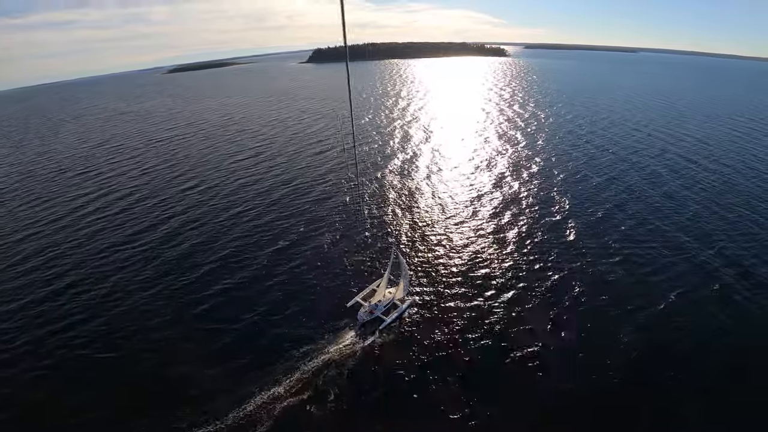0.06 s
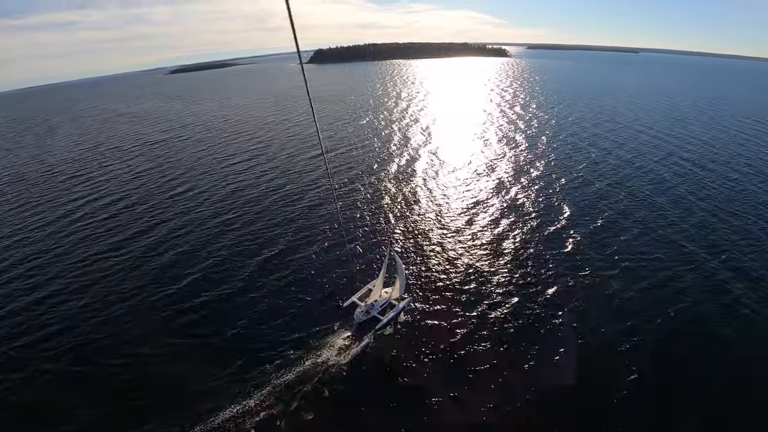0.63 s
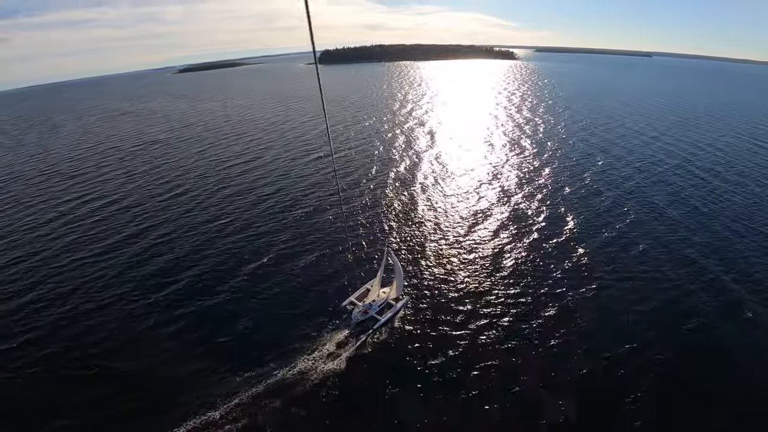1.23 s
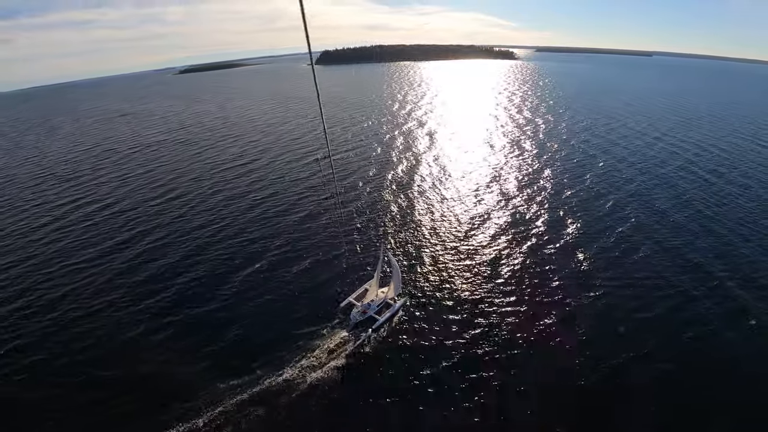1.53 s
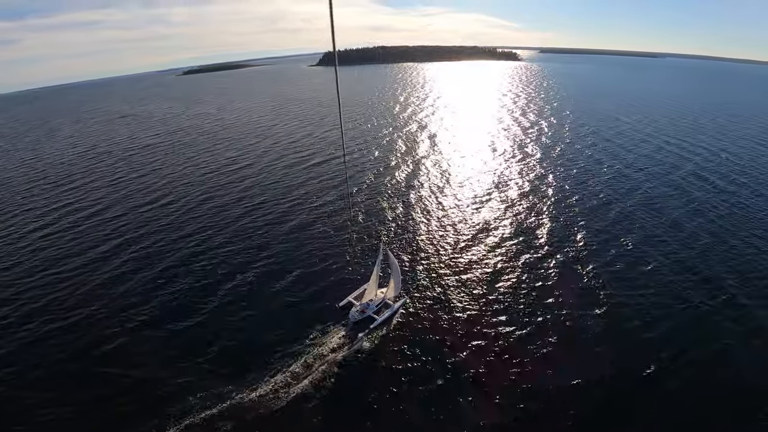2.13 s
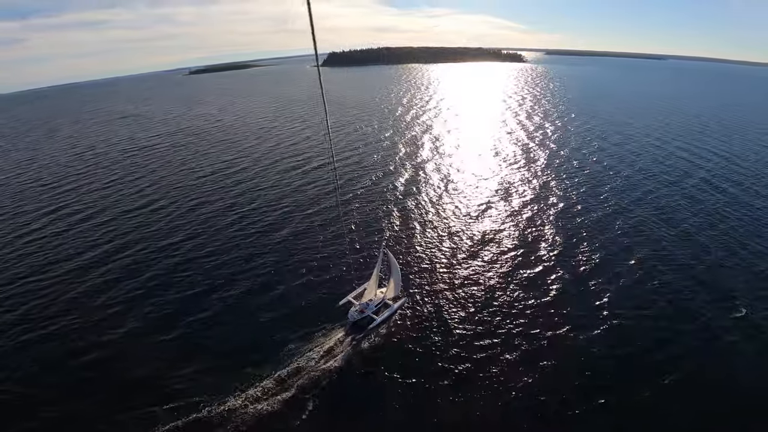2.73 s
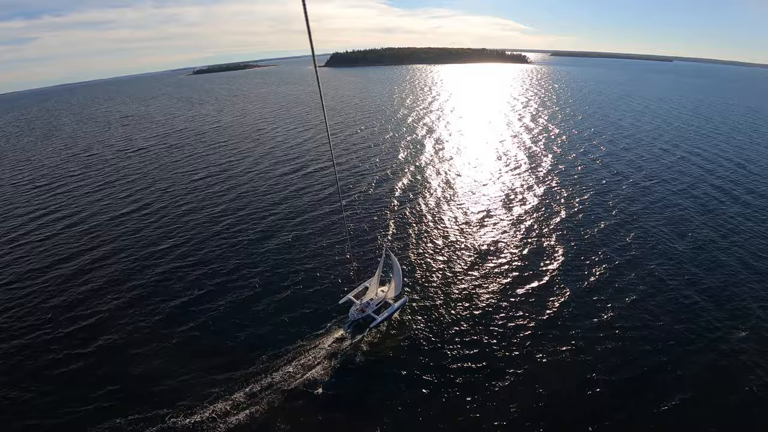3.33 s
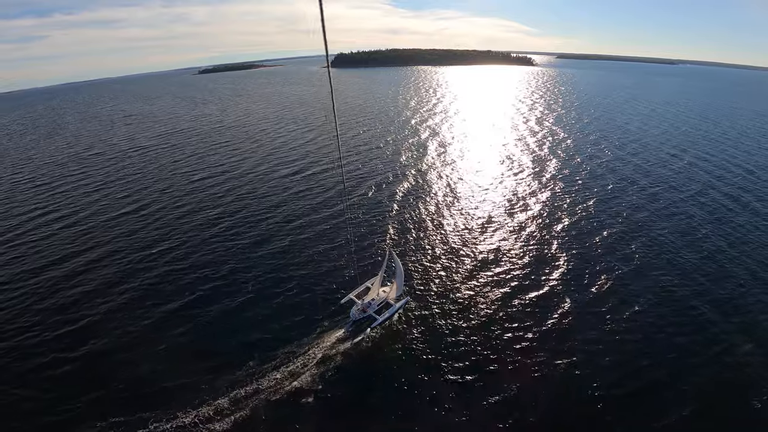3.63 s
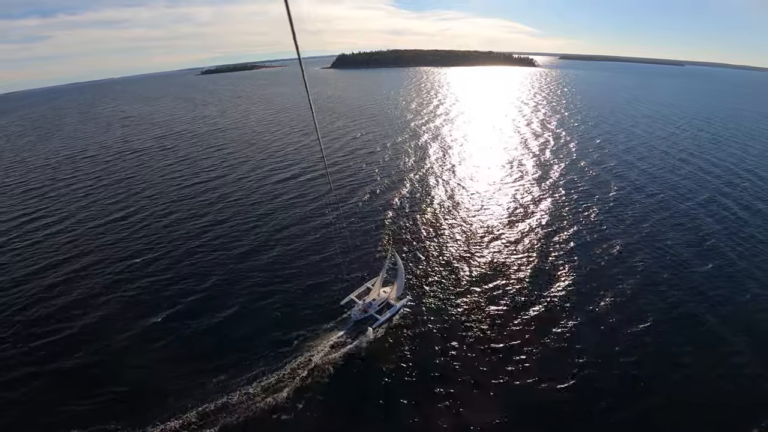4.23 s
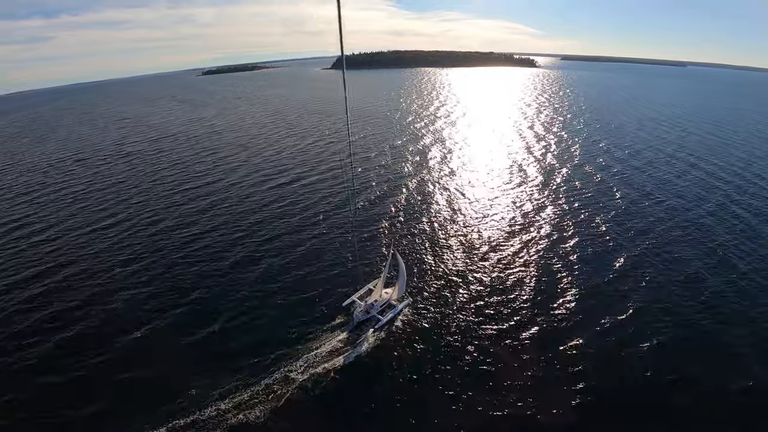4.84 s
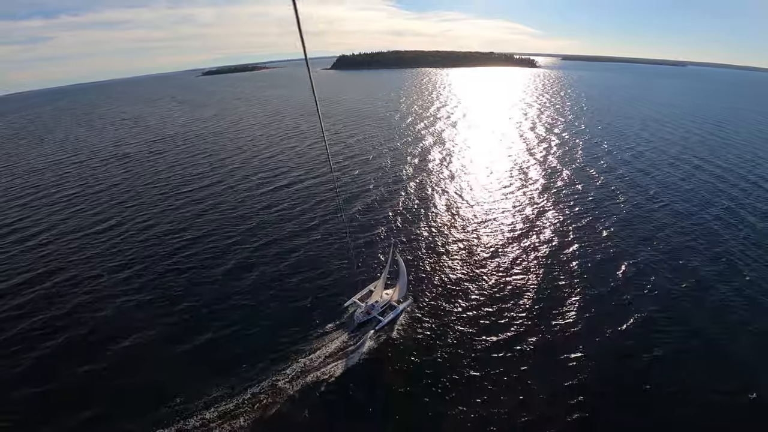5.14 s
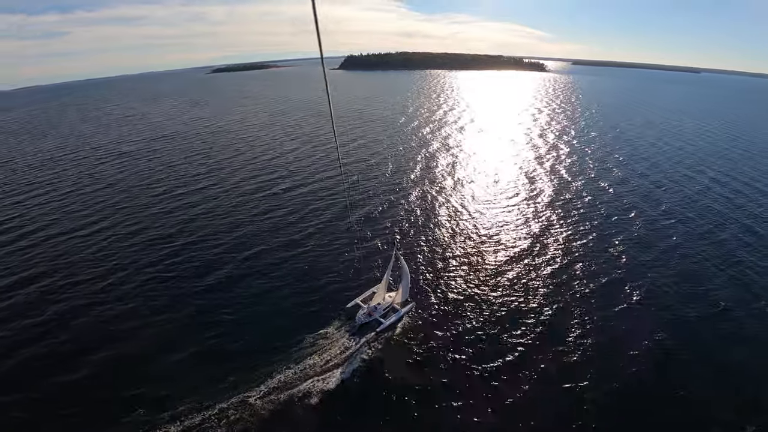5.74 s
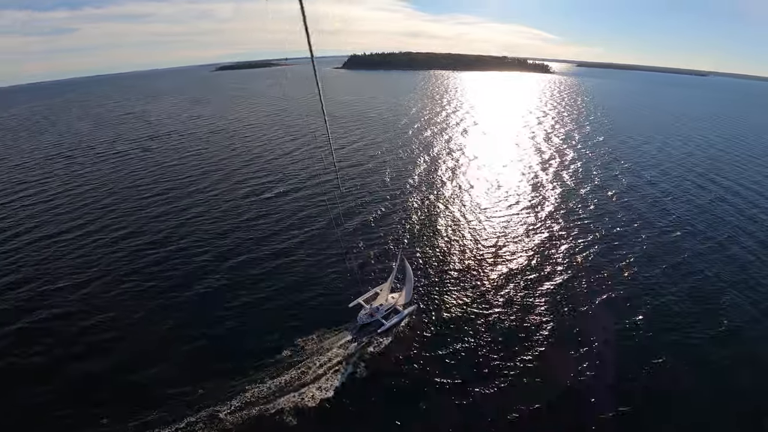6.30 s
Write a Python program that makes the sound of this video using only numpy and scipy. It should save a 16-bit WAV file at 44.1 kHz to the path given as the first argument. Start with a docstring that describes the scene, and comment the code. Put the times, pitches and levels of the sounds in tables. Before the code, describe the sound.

From the start, wind buffets the microphone of a camera hanging from a kite line, making a deep, throbbing rumble full of irregular thumps and brief lulls. A softer rush and hiss of air runs underneath throughout, with a light whoosh around 0.9 seconds and another just after 4. The taut line sings a thin, wavering, mid-pitched hum, much quieter than the rumble, flaring briefly now and then. At about 4 seconds the hum steps slightly higher and wanders more, while the hiss swells a little. Three short, hard gusts then break over the microphone with a low, fluttering roar: one at about 4.8 seconds, one at 5, and a longer one from 5.5 to 5.8. The rumble, hiss and hum continue until the sound ends at about 6.4 seconds.

```python
"""A deep, throbbing rumble: eddies buffet the microphone of a camera on a kite line above a sailing boat.
Air rushes and hisses round the housing. The taut line sheds vortices and sings a thin, wavering
aeolian tone. Near the end three hard gusts break over the microphone port."""
import sys
import numpy as np
from scipy import signal
from scipy.fft import rfft, irfft
from scipy.io import wavfile
from scipy.ndimage import uniform_filter1d

SR = 44100
rng = np.random.default_rng(int(sys.argv[2]) if len(sys.argv) > 2 else 0)


def log_audio(samples):
    """Write samples as a 16-bit WAV file to the path given in sys.argv[1]."""
    # one column per channel
    frames = np.atleast_2d(samples).T
    # limit to full scale, then quantise
    limited = np.clip(frames, -1, 1)
    pcm = np.round(limited * 32767).astype(np.int16)
    wavfile.write(sys.argv[1], SR, pcm)


N = 280917
TIME_S = np.arange(N) / SR

# Flow round the housing, re its usual strength: t/s, level/dB
FLOW_LEVEL = [(0, -3.5), (.12, -5), (.35, -1.5), (.65, -1.5), (.71, .3), (.82, 0.5), (.92, 0.5), (1.2, 1),
              (1.27, 1.5), (1.6, -0.5), (1.72, -0.5), (1.83, 0), (1.9, -1.5), (2.0, 0.5), (2.4, -0.4),
              (2.48, 0.8), (2.57, -0.5), (2.9, -0.1), (3.08, 0), (3.17, 0), (3.24, 1.5), (3.35, 0),
              (3.63, 2), (3.71, -0.3), (3.83, -0.5), (3.88, 0.5), (4.06, 0), (4.095, 2), (4.28, 2),
              (4.35, 2.5), (4.55, 3.5), (4.77, 3.5), (4.805, 4.5), (4.83, 3.5), (4.89, 3), (4.94, 1.4),
              (5.16, -0.5), (5.3, 0), (5.43, 1), (5.49, 2.5), (5.58, 1), (5.72, -0.5), (5.87, -1.5),
              (6.12, 0.5), (6.21, -0.5), (6.37, 2.8)]
# Small eddies in the housing's wake: t/s, level/dB
CHURN_LEVEL = [(0, -41), (.8, -38.5), (1.45, -36.5), (1.8, -39), (2.05, -38.5), (2.25, -35.5), (2.5, -36),
               (3.2, -36), (3.95, -33), (4.2, -34.5), (4.7, -31.5), (5.3, -34.5), (5.9, -36), (6.37, -31.5)]
# Air whooshing past: t/s, level/dB
WHOOSH_LEVEL = [(0, -50.5), (.2, -52.5), (.35, -50), (.62, -49), (.79, -46.5), (.87, -45), (.98, -48.5),
                (1.08, -48.5), (1.3, -52.5), (1.7, -55), (2.4, -51.5), (3.3, -55.5), (3.8, -52.5),
                (4.06, -50), (4.1, -46), (4.5, -52), (4.88, -52.5), (4.96, -65), (6.37, -59.5)]
# Air noise spectra, relative density: f/Hz, level/dB
CHURN_SPECTRUM = [(60, -13), (100, -2), (150, 1), (190, 0.5), (270, -0.5), (340, -7.5), (450, -19)]
RUSH_SPECTRUM = [(150, -10), (300, -5), (400, -5.5), (520, -4.5), (800, -10), (1050, -12), (1500, -17),
                 (2500, -26), (5000, -63)]
HISS_SPECTRUM = [(700, -6), (1500, -3), (2200, -1.1), (3300, -1.1), (4500, -1.5), (5200, -3), (6500, -23),
                 (9000, -48.5)]
FINE_HISS_SPECTRUM = [(3500, -11.5), (5000, 2), (5900, 2.5), (7000, -3), (8500, -10.5), (10000, -19),
                      (12000, -30.5), (15000, -43.5)]
WHOOSH_SPECTRUM = [(1700, -20), (2000, -2.5), (2300, 0), (2900, 0.5), (3500, 1), (4000, 0), (4600, -4),
                   (5400, -15)]

# Aeolian tone of the line: t/s, shedding f/Hz, level/dB
LINE_TONE = [(0, 647, -49), (.5, 649, -46), (.85, 647.3, -43), (1.2, 645, -44.5), (1.5, 647.7, -42),
             (2.0, 643.5, -42), (2.35, 646, -40.5), (2.7, 643, -41.5), (3.05, 643, -46.5),
             (3.85, 642.6, -43), (4.2, 674, -41), (4.5, 668.4, -41), (4.8, 667, -42.5), (5.12, 698.6, -47),
             (5.45, 676.7, -39.3), (5.65, 680, -42.5), (5.85, 695, -43.5), (6.15, 679, -41.5),
             (6.37, 674, -45)]
# Brief flares of the tone: t/s, length/s, rise/dB
LINE_FLARES = [(1.12, 0.05, 8), (1.395, 0.045, 9.5), (1.74, 0.043, 4.5), (1.98, 0.11, 6),
               (2.34, 0.046, 2.5), (2.93, 0.058, 4), (3.15, .09, 5), (3.28, 0.028, 7), (3.58, .07, -4),
               (4.01, 0.063, 7.5), (4.245, 0.036, 9), (4.46, 0.15, 5.5), (5.09, 0.041, 12.5),
               (5.38, 0.08, 3), (5.545, 0.048, 8), (6.17, .1, 5.5)]

# Eddy pressure on the port: t/s, level/dB
BUFFET_LEVEL = [(0, -26), (.7, -24.5), (1.05, -22.5), (1.5, -22.5), (2.0, -22.5), (2.7, -22.5),
                (3.5, -25.5), (4.3, -29), (4.8, -23.5), (5.25, -26), (5.62, -22), (5.9, -29), (6.37, -21.5)]
# Its spectrum, relative density: f/Hz, level/dB
BUFFET_SPECTRUM = [(8, -19), (22, -1.5), (48, 3), (68, -2), (98, -3), (125, -10.5), (150, -10), (190, -20),
                   (280, -21.5), (400, -37.5), (1000, -75.5)]
# Single large eddies: t/s, length/s, rise/dB
EDDY_THUMPS = [(.13, 0.18, 4), (.3, 0.15, 5.5), (.41, 0.11, 3), (.65, 0.086, 5.5), (.83, 0.072, 0.5),
               (.92, .06, 0.5), (1.075, 0.082, 5.5), (1.13, 0.059, 8), (1.24, 0.07, 2.5),
               (1.325, 0.071, 4.5), (1.385, .05, 1.5), (1.435, 0.066, -0.5), (1.72, 0.12, 6.5),
               (1.78, .06, 3.5), (1.915, 0.061, 5), (1.98, 0.044, 4), (2.03, 0.038, 3), (2.1, .05, -2),
               (2.185, .06, 5), (2.26, .05, 2), (2.34, 0.087, 4.5), (2.61, 0.058, -3), (2.72, 0.029, 2.5),
               (2.96, 0.044, 3.5), (3.08, 0.053, 5.5), (3.4, 0.048, 6.5), (3.49, 0.053, 2),
               (3.58, 0.06, 3.5), (3.67, 0.06, 5), (3.98, 0.083, 3.5), (4.07, 0.12, 4.5),
               (4.37, 0.064, 7.5), (4.555, 0.1, 7), (4.625, 0.064, 4), (4.857, .04, 7.5),
               (5.37, 0.079, 2.5), (5.5, 0.041, 5), (5.91, 0.057, 9), (6.21, 0.073, 4)]
# Lulls between eddies: t/s, length/s, drop/dB
EDDY_LULLS = [(.195, 0.037, 3), (.49, 0.079, 6), (.595, .05, 4), (.73, 0.16, 9), (1.19, .05, 1),
              (1.535, 0.079, 7), (1.875, 0.07, 4), (2.14, .04, 2), (2.29, .04, 3), (2.49, 0.042, 4),
              (2.9, 0.066, 11), (3.33, .05, 2), (3.73, 0.056, -0.5), (4.48, 0.046, 3), (4.9, .08, 10),
              (5.82, 0.094, 1), (6.03, 0.12, 0)]

# Bursts, 2-3 per gust: start t/s, end t/s, shedding f/Hz, push level/dB, roar level/dB
GUST_BURSTS = [(4.735, 4.786, 88, -21, -22), (4.794, 4.833, 99, -21, -20), (4.964, 5.003, 64, -16, -22),
               (5.01, 5.052, 108, -15.5, -22), (5.535, 5.622, 92, -18.5, -21.5),
               (5.621, 5.694, 78, -18.5, -23), (5.685, 5.769, 60, -18.5, -22.5)]
# Gust roar spectrum, relative density: f/Hz, level/dB
ROAR_SPECTRUM = [(80, -8), (110, 5.5), (160, 5.5), (210, -3.5), (270, -1.5), (400, -9), (550, -17),
                 (900, -31), (2000, -69)]
# Lopsided vortex push: multiple of the shedding rate, relative level/dB
PUSH_HARMONICS = [(1, 0.5), (2, -4), (3, -14)]


def undb(db):
    """Decibels to gain."""
    return 10 ** (np.asarray(db) / 20)


def unit_rms(x):
    """Scale to rms 1."""
    return x / np.sqrt(np.mean(x ** 2))


def steady_rms(x, span_s):
    """Hold the running rms near 1."""
    width = max(int(span_s * SR), 2)
    return x / np.sqrt(uniform_filter1d(uniform_filter1d(x ** 2, width), width))


def curves(table):
    """Interpolate each column of a timed table per sample."""
    times_s, *columns = np.transpose(table)
    return [np.interp(TIME_S, times_s, column) for column in columns]


def swells_db(table):
    """Sum of cosine humps, each centred on its row's time."""
    return sum(db * np.cos(np.pi * np.clip((TIME_S - centre_s) / length_s, -0.5, 0.5))
               for centre_s, length_s, db in table)


def wander(rate_hz):
    """Smooth random drift, rms 1, changing at about rate_hz."""
    bins_hz = np.arange(N // 2 + 1) * SR / N
    lowpass = np.exp(-(bins_hz / rate_hz / 2) ** 2)
    return unit_rms(irfft(rfft(rng.standard_normal(N)) * lowpass, N))


def turbulence(spectrum):
    """Shaped random pressure, rms 1; -24 dB/octave above the last point."""
    hz, db = np.transpose(spectrum)
    bins_hz = np.maximum(np.arange(N // 2 + 1) * SR / N, 1)
    shape = undb(np.interp(np.log(bins_hz), np.log(hz), db))
    rolloff = np.minimum(hz[-1] / bins_hz, 1) ** 4
    return unit_rms(irfft(rfft(rng.standard_normal(N)) * shape * rolloff, N))


def port_notch(x, centre_hz=5210, width_hz=490, gain_db=-4):
    """Two paths into the port partly cancel a narrow treble band."""
    b, a = signal.iirpeak(centre_hz, centre_hz / width_hz, fs=SR)
    return x - (1 - undb(gain_db)) * signal.lfilter(b, a, x)


def airflow(rush_flutter_db, hiss_flutter_db, fine_flutter_db, grit_db):
    """Air churns behind the housing, rushes round it, hisses on its edges and whooshes past."""
    flow_db, = curves(FLOW_LEVEL)
    whoosh_db, = curves(WHOOSH_LEVEL)
    churn_db, = curves(CHURN_LEVEL)
    flutter = 0.56 * wander(9.1) + 0.48 * wander(32)  # passing eddies
    shared_grit_db = grit_db * wander(250)
    rush_db = -38 + 0.66 * flow_db + rush_flutter_db * flutter
    hiss_db = -48.5 + flow_db + hiss_flutter_db * flutter
    fine_db = -54.5 + 1.35 * flow_db + hiss_flutter_db * flutter
    churn = turbulence(CHURN_SPECTRUM) * undb(churn_db)
    rush = turbulence(RUSH_SPECTRUM) * undb(rush_db)
    hiss = turbulence(HISS_SPECTRUM) * undb(hiss_db + shared_grit_db)
    fine_hiss = turbulence(FINE_HISS_SPECTRUM) * undb(fine_db)
    fine_hiss *= undb(fine_flutter_db * wander(12) + grit_db * wander(250))
    whoosh = turbulence(WHOOSH_SPECTRUM) * undb(whoosh_db + shared_grit_db)
    return port_notch(churn + rush + hiss + fine_hiss + whoosh)


def singing_line(waver_hz, jitter_hz, flicker_db, edge_boost_db, span_s):
    """Wind speed sets the vortex shedding pitch; seven stretches of line each meet a different wind."""
    pitch_hz, level_db = curves(LINE_TONE)
    spread_hz = 29 - 0.25 * (pitch_hz - 640)  # narrows as the wind stiffens
    centre_hz = pitch_hz + waver_hz * wander(3.59)
    tone = 0
    for place in np.linspace(-1, 1, num=7):
        stretch_hz = centre_hz + spread_hz * place + jitter_hz * wander(12.83)
        phase_rad = 2 * np.pi * (np.cumsum(stretch_hz) / SR + rng.random())
        stretch_db = flicker_db * wander(15) + edge_boost_db * abs(place)
        tone += undb(stretch_db) * np.sin(phase_rad)
    return steady_rms(tone, span_s) * undb(level_db + swells_db(LINE_FLARES))


def buffeting(deep_hz, span_s, deep_span_s):
    """Large eddies press on the diaphragm: a rumble with thumps and lulls below deep_hz."""
    level_db, = curves(BUFFET_LEVEL)
    pressure = steady_rms(turbulence(BUFFET_SPECTRUM), span_s)
    deep = signal.sosfiltfilt(signal.butter(4, deep_hz, fs=SR, output="sos"), pressure)
    eddy_db = swells_db(EDDY_THUMPS) - swells_db(EDDY_LULLS)
    thumping = steady_rms(deep, deep_span_s) * np.std(deep) * undb(eddy_db)
    return (thumping + pressure - deep) * undb(level_db)


def gusts(rise_s, fall_s, stagger, stagger_hz, push_scatter_db, roar_span_s):
    """Flow tears off at the port: vortex pushes under a roar of small eddies. Returns pressure, gate."""
    roar = steady_rms(turbulence(ROAR_SPECTRUM), roar_span_s)
    uneven_time_s = np.cumsum(np.exp(stagger * wander(stagger_hz))) / SR
    push_gain = undb(-push_scatter_db * wander(30))
    pressure, torn_gate = 0, 0
    for start_s, end_s, shed_hz, push_db, roar_db in GUST_BURSTS:
        ramp = np.minimum((TIME_S - start_s) / rise_s, (end_s - TIME_S) / fall_s)
        gate = np.clip(ramp + 0.5, 0, 1)
        phase_rad = 2 * np.pi * shed_hz * uneven_time_s
        pushes = unit_rms(sum(undb(db) * np.sin(k * phase_rad) for k, db in PUSH_HARMONICS))
        pressure += gate * (pushes * push_gain * undb(push_db) + roar * undb(roar_db))
        torn_gate += gate
    return pressure, torn_gate


def scene():
    """Mono sum at the microphone; the rumble drops 4 dB while the flow is torn off."""
    gust, torn_gate = gusts(rise_s=0.017, fall_s=0.013, stagger=0.27, stagger_hz=41.8,
                            push_scatter_db=1.0, roar_span_s=0.028)
    rumble = buffeting(deep_hz=122, span_s=0.045, deep_span_s=0.034) * undb(-4 * torn_gate)
    air = airflow(rush_flutter_db=0.9, hiss_flutter_db=0.77, fine_flutter_db=0.7, grit_db=0.73)
    line = singing_line(waver_hz=4.94, jitter_hz=6.01, flicker_db=3.0, edge_boost_db=2, span_s=0.052)
    return (air + line + rumble + gust)[None]


def record(dry):
    """The microphone soft-clips, the camera cuts the top; short fades at both ends."""
    fade_s, cutoff_hz = 0.008, 13000
    fade = np.clip(np.minimum(TIME_S, TIME_S[-1] - TIME_S) / fade_s, 0, 1)
    lowpass = signal.ellip(8, 0.2, 70, cutoff_hz, fs=SR, output="sos")
    return signal.sosfilt(lowpass, np.tanh(dry) * fade)


dry = scene()
out = record(dry)
log_audio(out)
```